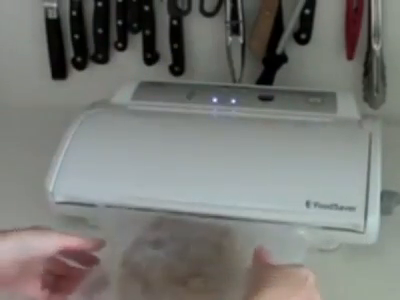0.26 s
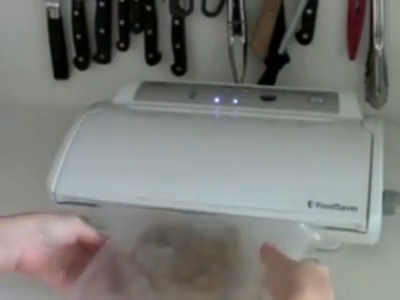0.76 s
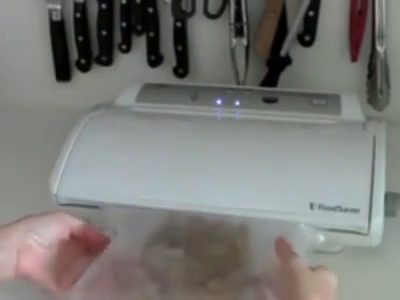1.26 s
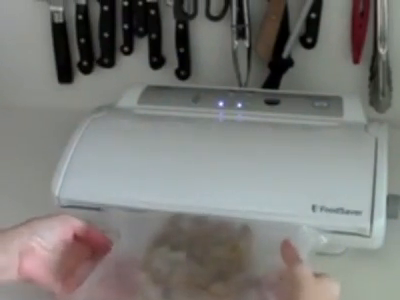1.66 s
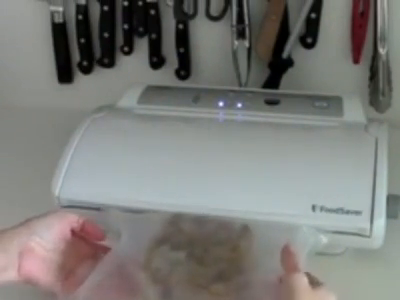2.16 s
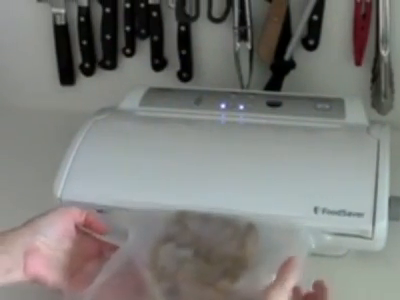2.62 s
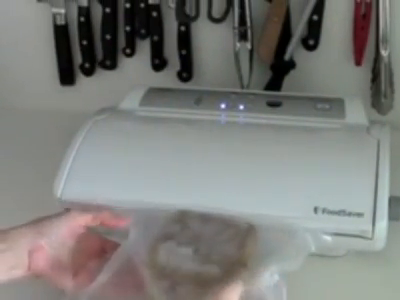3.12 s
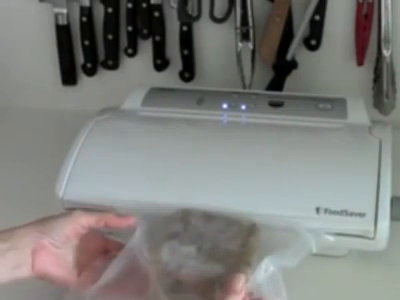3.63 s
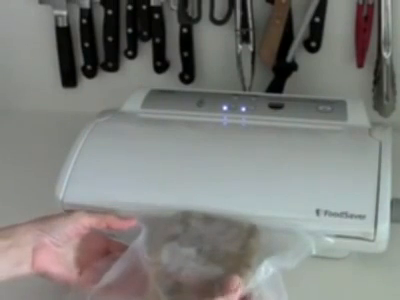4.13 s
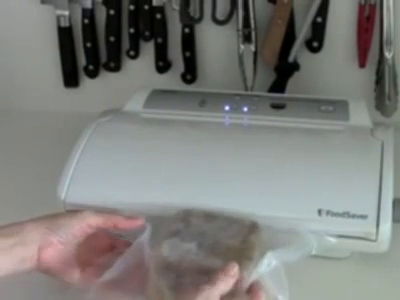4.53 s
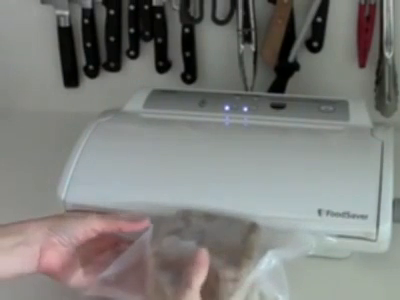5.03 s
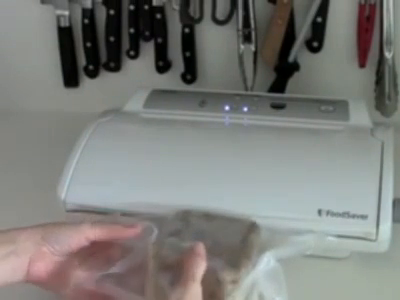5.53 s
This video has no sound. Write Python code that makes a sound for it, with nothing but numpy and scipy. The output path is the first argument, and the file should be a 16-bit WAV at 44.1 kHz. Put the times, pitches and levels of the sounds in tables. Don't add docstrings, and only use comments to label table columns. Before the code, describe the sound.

A kitchen vacuum sealer drones with a rough, steady buzzing pump while the plastic bag crackles and snaps as it shrinks tight.

```python
import sys
import numpy as np
from scipy import signal
from scipy.io import wavfile

SR = 44100
rng = np.random.default_rng(int(sys.argv[2]) if len(sys.argv) > 2 else 0)


def transcribe(u):
    v = np.clip(np.atleast_2d(u).T, -1, 1)
    q = np.round(v * 32767).astype(np.int16)
    wavfile.write(sys.argv[1], SR, q)


def decibels_to_gain(level_db):
    exponent = np.asarray(level_db, float) / 20
    return 10 ** exponent


N = 254898

# (time [s], speed [turns/s])
SPEED = [
    (0.0, 49.37),
    (0.3, 49.2),
    (1.3, 48.78),
    (2.3, 48.52),
    (3.8, 48.43),
    (4.7, 48.25),
    (5.25, 47.95),
    (5.5, 47.88),
    (5.65, 47.69),
    (5.78, 47.13),
]
# (time [s], peak level [dB], ring pitch [Hz], level of the broad part [dB])
SNAPS = [(.253, -6.5, 3160, -0.5), (0.3157, -0.5, 2980, -6), (.3224, -6.5, 3100, -9), (.637, -15, 3360, 4),
         (.6473, -9, 2900, -7), (.7932, -20.5, 5560, 7), (.968, -15.5, 3580, -2), (1.4074, -22, 3940, 6),
         (2.611, -7.5, 3080, -3.5), (2.6483, -14, 4040, 5), (3.043, -19, 6900, -10),
         (3.2003, -17.5, 3620, 5), (3.4058, -8.5, 3200, -20), (3.581, -23.5, 3880, 9.5),
         (3.844, -10.5, 3260, -4), (3.926, -6, 3130, -2.5), (4.1966, -16, 3670, -5),
         (4.3284, -9.5, 3160, -12), (4.4172, -12.5, 4300, 3), (4.825, -3, 3260, -3), (5.004, -13, 3280, -6),
         (5.1063, -18, 3080, -3), (5.2152, -6, 2880, -6), (5.3082, -11, 3000, -15), (5.3865, -4, 2970, -5),
         (5.4933, -17, 3120, -11), (5.5518, -11, 2890, -10), (5.566, -16, 5200, 3), (5.6057, -11, 6500, -5),
         (5.7714, -6, 2760, -15)]
RIPPLE_HZ = 119.94


def rms_one(x):
    return x / np.sqrt(np.mean(x ** 2) + 1e-20)


def band(x, low_hz, high_hz):
    return signal.sosfilt(signal.butter(2, [low_hz, high_hz], "band", fs=SR, output="sos"), x)


def resonance(x, hz, width_hz):
    r = np.exp(-np.pi * width_hz / SR)
    feedback = [1, -2 * r * np.cos(2 * np.pi * hz / SR), r * r]
    return signal.lfilter(np.array([1, 0, -1]) * (1 - r * r) / 2, feedback, x)


def drift(rate_hz, size):
    knots = rng.standard_normal(int(size / SR * rate_hz * 2) + 2)
    place = np.arange(size) / SR * rate_hz * 2
    return np.interp(place, np.arange(len(knots)), knots) * np.sqrt(3 / 2)


def lost_samples():
    # (time [s], lost shaft rotation [turns])
    skips = [(.21, 1), (.63, 1), (1.05, 1), (1.43, 1), (1.83, .59), (2.085, .59), (2.35, 1), (2.76, 1),
             (3.16, 1), (3.57, 1), (3.99, 1), (4.385, 1.475), (4.6, 1), (4.985, 1.475), (5.2, 1), (5.64, 1)]
    at, turns = np.transpose(skips)
    speed = np.interp(at, *np.transpose(SPEED))
    return (at * SR).astype(int), np.round(turns / speed * SR).astype(int)


def in_kitchen_time(rows):
    at, lost = lost_samples()
    repeats = 1 + np.bincount(at, lost, N).astype(int)
    heard_s = np.repeat(np.arange(N), repeats) / SR
    s, *columns = np.transpose(rows)
    return [np.interp(heard_s, s, column) for column in columns]


def drop_pieces(x, fade_s):
    at, lost = lost_samples()
    out, shift, now = x[:N].copy(), 0, np.arange(N)
    for start, gap in zip(at, lost):
        shift += gap
        new = np.clip((now - start) / (fade_s * SR) + .5, 0, 1)
        out = (1 - new) * out + new * x[shift:shift + N]
    return out


def shaft(seconds):
    turns = np.cumsum(in_kitchen_time(SPEED)[0]) / SR
    beat = 2 * np.pi * (5 * turns - 2 * RIPPLE_HZ * seconds)
    return turns + .0042 * np.sin(beat + 1.8) + .0040 * np.sin(2 * beat - 2.7)


def strokes(turns, seconds, load, ripple_depth, unsteady_db):
    # (multiple of shaft speed [-], free rms [dB], pulling rms [dB], tight rms [dB])
    stroke_overtones = [(3, -37, -40, -37), (4, -32, -42.5, -37), (5, -39, -41.5, -49),
                        (7, -37.5, -36.5, -35), (8, -27.5, -31, -32), (9, -33.5, -33, -38),
                        (10, -31, -31, -43.5), (11, -34.5, -43.5, -45), (12, -39, -46.5, -54),
                        (13, -41, -35.5, -38), (14, -31, -33, -32.5), (15, -29.5, -26.5, -27),
                        (16, -37, -46.5, -29), (17, -30.5, -27.5, -25.5), (18, -36, -29, -34),
                        (19, -40, -31.5, -37.5), (20, -45, -37.5, -31), (21, -33.5, -33, -42),
                        (22, -36, -38, -36.5), (23, -39, -32.5, -47), (24, -27.5, -38, -50),
                        (26, -38, -38.5, -40), (27, -36, -29, -45), (28, -43, -34, -31),
                        (29, -32, -33.5, -53), (30, -47, -50.5, -65), (31, -43, -35.5, -39),
                        (32, -44, -41, -52), (33, -41, -47, -36), (34, -54, -32.5, -40)]
    # (multiple of shaft speed [-], rms [dB])
    grip_overtones = [(3, -39), (4, -36.5), (7, -38), (8, -33), (9, -34.5), (12, -38.5), (13, -33.5),
                      (14, -35.5), (15, -27), (16, -34), (18, -31), (21, -44), (24, -41), (26, -36.5),
                      (27, -39), (30, -47), (32, -32.5), (34, -39)]
    # (multiple of shaft speed [-], rms [dB])
    labour_overtones = [(4, -35), (12, -33), (13, -36), (15, -23.5), (20, -27.5), (25, -34), (29, -34),
                        (34, -39), (36, -33), (37, -31)]
    faint_low_db, faint_db, labour_sink_db = -49, -43.5, -3.5

    listed = {round(k): db for k, *db in stroke_overtones}
    gripping = {round(k): db for k, db in grip_overtones}
    singing = {round(k): db for k, db in labour_overtones}
    ripple = np.cos(2 * np.pi * RIPPLE_HZ * seconds)
    smear = np.clip(.3 + .6 * np.abs(load - 1), 0, 1)
    out = 0
    for k in range(1, 40):
        free, pull, tight = listed.get(k, [faint_db if k > 6 else faint_low_db] * 3)
        labour = singing.get(k, tight + labour_sink_db)
        level_db = np.interp(load, [0, .5, 1, 2, 3], [free, gripping.get(k, pull), pull, tight, labour])
        gain = decibels_to_gain(level_db + unsteady_db / 2 * drift(3, len(load)))
        lag = 2.65 * k + .075 * max(k - 17, 0) ** 2 + rng.normal(0, .4)
        lag = lag + smear * (.3 if k < 10 else 1.4) * rng.uniform(-np.pi, np.pi)
        out = out + gain * (1 + ripple_depth * k * ripple) * np.cos(2 * np.pi * k * turns - lag)
    return np.sqrt(2) * out


def bag(crack_s, tail_s, tail_db):
    dull_db, sharp_db = -2, -12
    after_s, after_db = .004, -7
    out, age = np.zeros(N + 4000), np.arange(4000) / SR
    noises = rng.standard_normal((len(SNAPS), 4001))
    for (s, peak_db, hz, broad_db), noise in zip(SNAPS, noises):
        again = age - after_s * decibels_to_gain(2 * noise[-1])
        shape = np.exp(-age / crack_s) + decibels_to_gain(tail_db) * np.exp(-age / tail_s)
        shape = shape + decibels_to_gain(after_db) * (again > 0) * np.exp(-np.abs(again) / crack_s)
        burst = shape * noise[:-1]
        parts = [(resonance(resonance(burst, hz, 0.5 * hz), hz, hz), 0),
                 (band(burst, 1740, 2560), broad_db + dull_db),
                 (band(burst, 3730, 9100), broad_db),
                 (band(burst, 13000, 21000), broad_db + sharp_db)]
        snap = sum(decibels_to_gain(db) * part / np.abs(part).max() for part, db in parts)
        out[round(s * SR):][:4000] += decibels_to_gain(peak_db) * snap
    return out[:N]


def rustle(level_db):
    at_rest_per_s, after_snap_per_s, settle_s = 27, 70, .15
    since = np.arange(N) / SR - np.array(SNAPS)[:, :1]
    stirred = np.sum((since > 0) * np.exp(-np.abs(since) / settle_s), axis=0)
    born = rng.random(N) < (at_rest_per_s + after_snap_per_s * stirred) / SR
    strength = decibels_to_gain(2.0 * np.minimum(rng.exponential(1, N), 3.0))
    creases = born * strength * rng.choice([-1, 1], N) + 1e-18
    pitches, dealt = np.geomspace(2300, 7500, 8), rng.integers(0, 8, N)
    out = 0
    for k, hz in enumerate(pitches):
        out = out + resonance(creases * (dealt == k), hz, 0.45 * hz) * 9000 / hz
    return decibels_to_gain(level_db) * out


def hiss(turns, puff_db, patchy_db):
    # (pitch [Hz], noise level [dB per Hz])
    hiss_levels = [(30, -16), (75, -22.5), (164, -11.5), (284, -23), (420, -12.5), (600, -11), (900, -3),
                   (1500, -8.5), (2000, -8.5), (2800, -21.5), (5500, -30), (9000, -26.5), (12000, -26.5),
                   (15300, -28)]
    # (pitch [Hz], width [Hz], level [dB])
    housing_peaks = [(2560, 320, -6.5), (4080, 450, 5.5), (7460, 150, 0), (9050, 160, 2.5), (10720, 51, 9),
                     (11500, 68, 8.5), (13000, 150, 2), (8900, 110, -3), (3100, 37, 6), (2400, 32, 7),
                     (2345, 100, -9), (1270, 37, -2.5), (1813, 75, -7)]
    hz_points, db_points = np.transpose(hiss_levels)
    edges = 30 * 2 ** np.arange(0, 9.1, .5)
    white, out = rng.standard_normal((2, len(turns))), 0
    for k, (low, high) in enumerate(zip(edges, edges[1:])):
        level_db = np.interp(np.log(low * high) / 2, np.log(hz_points), db_points)
        gain = decibels_to_gain(level_db + patchy_db * drift(12, len(turns)))
        out = out + gain * band(white[k % 2], low, high)
    out = out + sum((decibels_to_gain(db) - 1) * resonance(out, hz, width) for hz, width, db in housing_peaks)
    out = out - .4 * band(out, 450, 1800)
    return rms_one(out * decibels_to_gain(puff_db * np.cos(2 * np.pi * (turns - .3))))


def valve(turns, open_at, ring_hz):
    ticks = np.diff(np.floor(turns - open_at), prepend=0).clip(0, 1)
    ticks = ticks * decibels_to_gain(0.5 * drift(27, len(turns)))
    return rms_one(resonance(resonance(ticks + 1e-18, ring_hz, 190), ring_hz, 330))


def supply(turns, seconds, whine_db):
    # (multiple of ripple [-], multiple of shaft speed [-], rms [dB])
    hum_tones = [(1, 0, -48), (1, 1, -40.5), (1, 2, -51), (2, 0, -54), (1, 5, -57.5), (3, 0, -43),
                 (2, 3, -50.5), (4, 0, -63)]
    # (multiple of whine [-], multiple of ripple [-], rms [dB])
    whine_partials = [(1, 0, -28.5), (1, -1, -52), (1, 1, -41), (1, .5, -43), (2, 0, -44.5), (2, -1, -48.5),
                      (2, 1, -44.5)]
    whine_hz, hum, whine = 1969.4, 0, 0
    for m, k, db in hum_tones:
        hum = hum + decibels_to_gain(db) * np.cos(2 * np.pi * (m * RIPPLE_HZ * seconds + k * turns) + k)
    for w, m, db in whine_partials:
        whine = whine + decibels_to_gain(db) * np.cos(2 * np.pi * (w * whine_hz + m * RIPPLE_HZ) * seconds)
    return np.sqrt(2) * (hum + decibels_to_gain(whine_db) * whine)


def scene():
    # (time [s], load stage [-], effort level [dB])
    vacuum = [(0, 0, 0.5), (.6, 0, 1), (.66, 1, 0), (1.1, 0.43, 2), (1.55, 0.87, 1), (1.8, 1, 0.5),
              (2.8, 1, 0.5), (3.4, 1, 1), (4.4, 1.25, 1.5), (5.15, 1.84, 2.5), (5.23, 2, 2.5),
              (5.55, 2, 1.5), (5.68, 3, 2.5), (5.78, 3, 3)]
    load, effort_db = in_kitchen_time(vacuum)
    seconds = np.arange(len(load)) / SR
    turns = shaft(seconds)

    pump = decibels_to_gain(effort_db) * strokes(turns, seconds, load, ripple_depth=0.0079, unsteady_db=1.75)

    air = decibels_to_gain(-27 + 0.65 * effort_db) * hiss(turns, puff_db=1.25, patchy_db=1.38)
    air += decibels_to_gain(-37.5) * np.clip(load * 1.54, 0, 1) * valve(turns, open_at=0.42, ring_hz=2558)
    air += decibels_to_gain(-46.5) * valve(turns, open_at=0.3, ring_hz=3670)

    sag_db = -4 / (1 + np.exp((1.6 - seconds) / 0.095))
    whine_db = 1.5 + sag_db + 4.5 * np.clip(load - 2, 0, 1)

    sealer = drop_pieces(pump + supply(turns, seconds, whine_db) + air, fade_s=0.026)
    snaps = bag(crack_s=0.00065, tail_s=0.032, tail_db=-18)
    return (sealer + rustle(level_db=-23) + snaps)[None]


def roll_off(x):
    return signal.sosfilt(signal.butter(12, 15790, fs=SR, output="sos"), x)


def record(dry):
    echo_s, echo_db, cutoff_hz, offset = .06, -7, 15800, 0.01
    lag = round(echo_s * SR)
    echo = np.concatenate([dry[:, lag:2 * lag], dry[:, :-lag]], axis=1)
    wet = dry + decibels_to_gain(echo_db) * echo
    wet = 0.92 * np.tanh(wet / 0.96)
    wet = signal.sosfilt(signal.cheby2(10, 60, cutoff_hz, fs=SR, output="sos"), wet) + offset
    return roll_off(wet)


dry = scene()
out = record(dry)
transcribe(out)
```